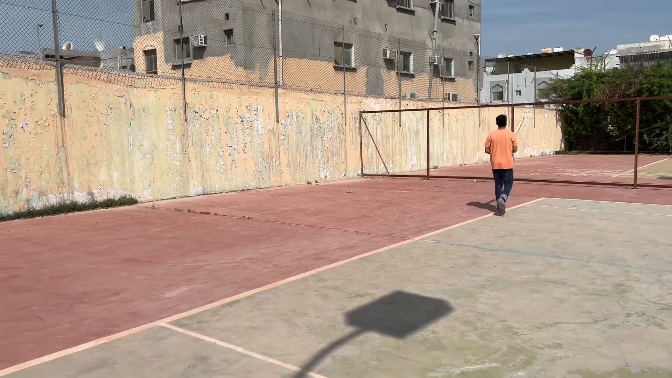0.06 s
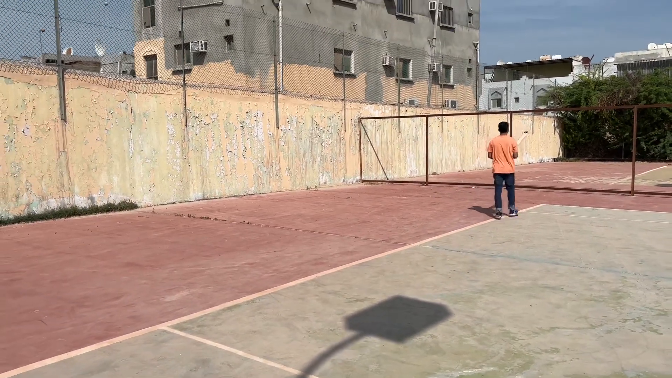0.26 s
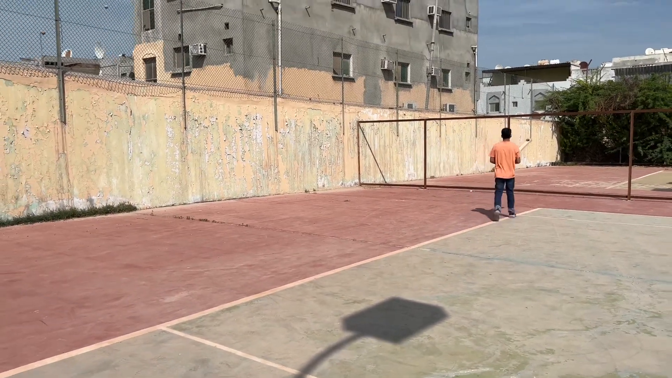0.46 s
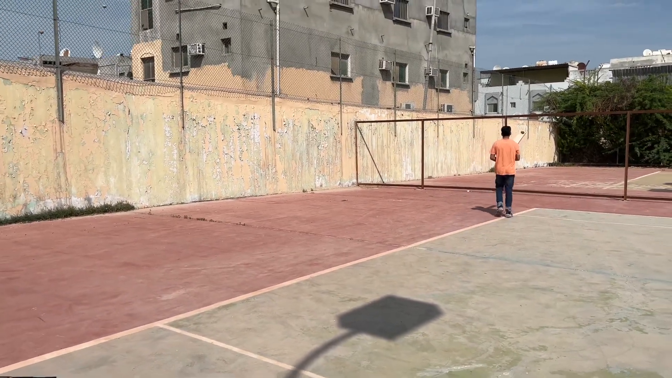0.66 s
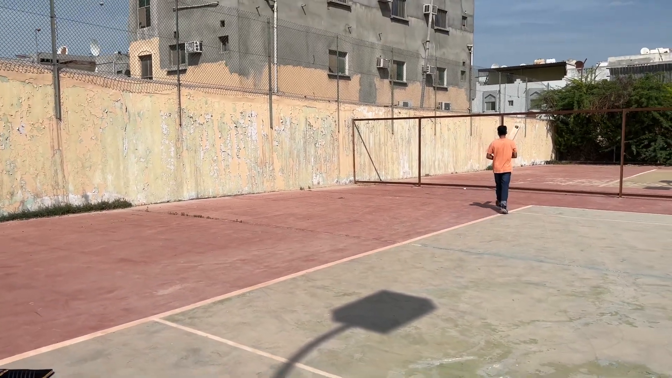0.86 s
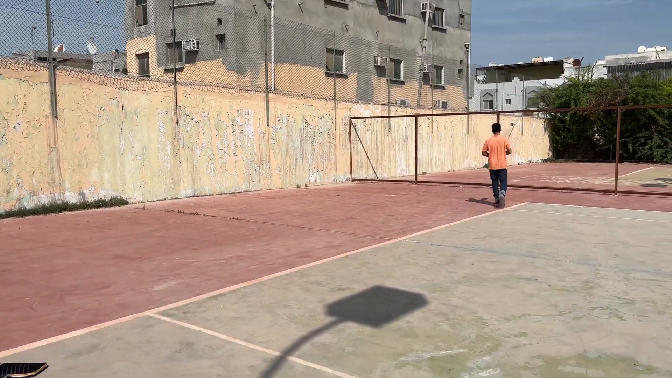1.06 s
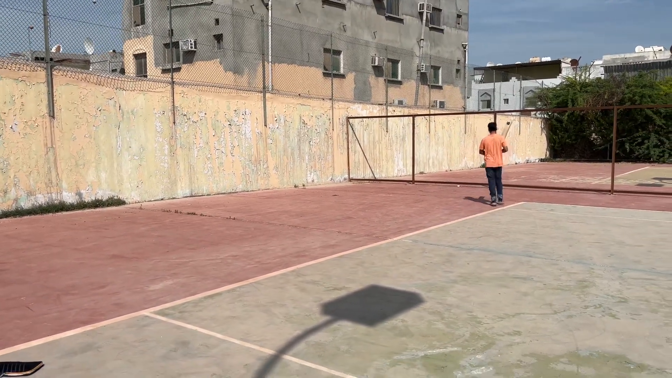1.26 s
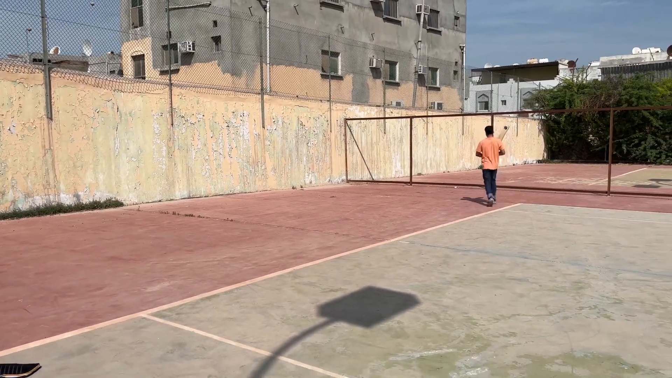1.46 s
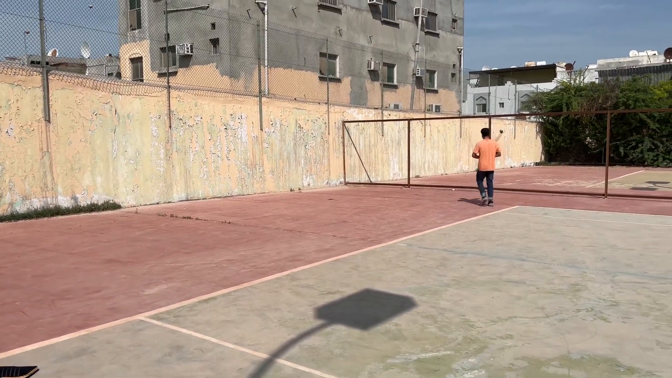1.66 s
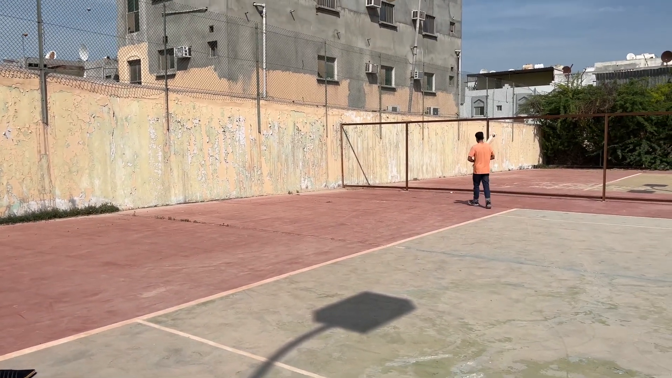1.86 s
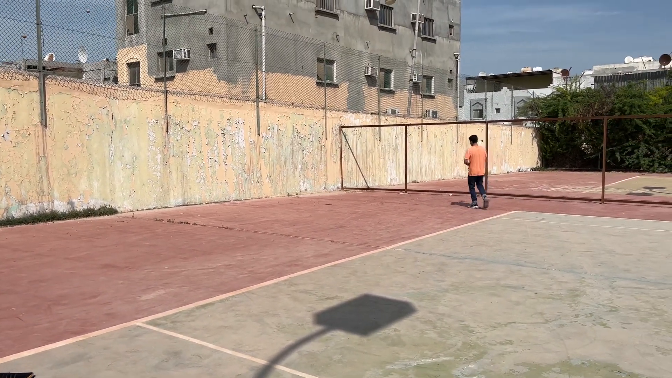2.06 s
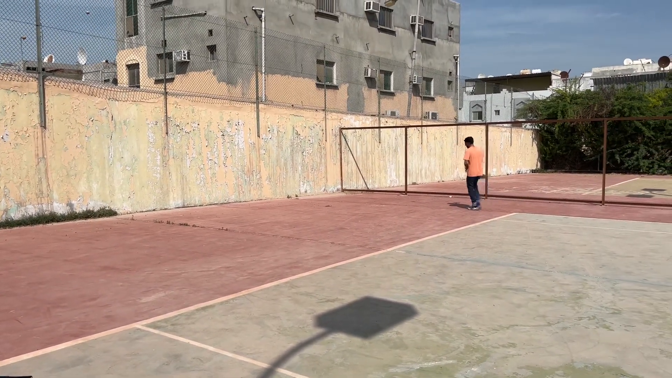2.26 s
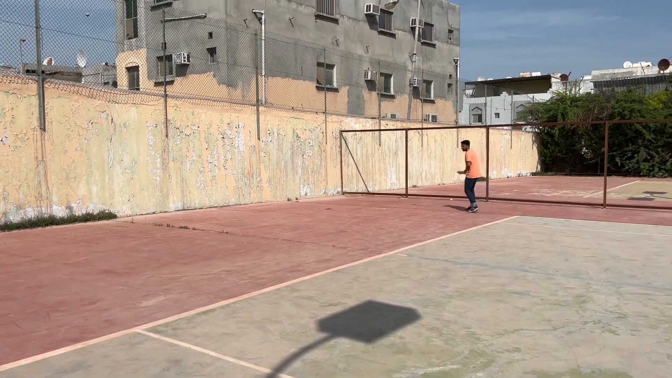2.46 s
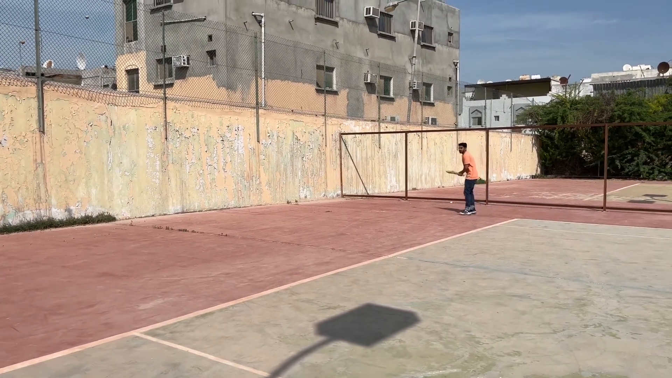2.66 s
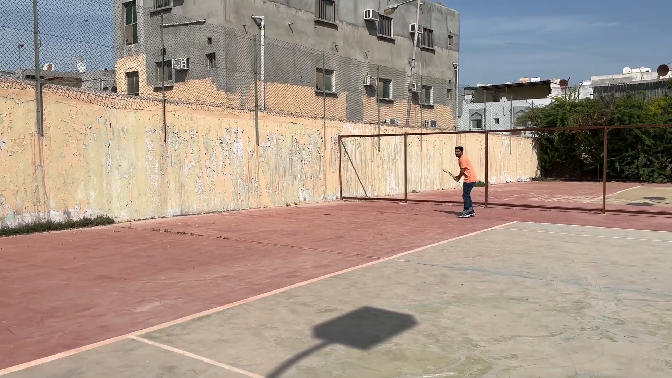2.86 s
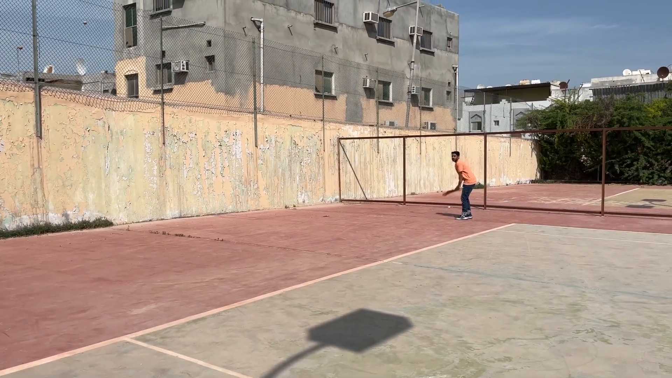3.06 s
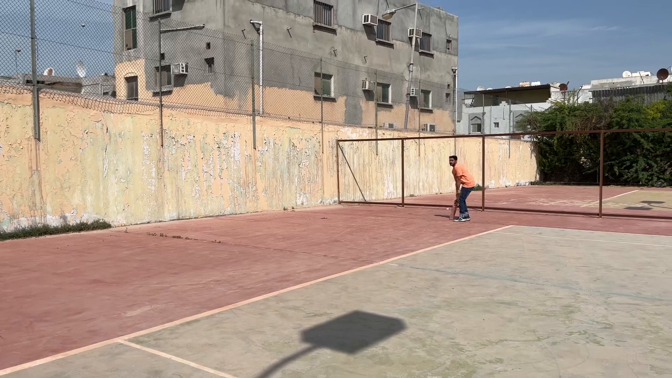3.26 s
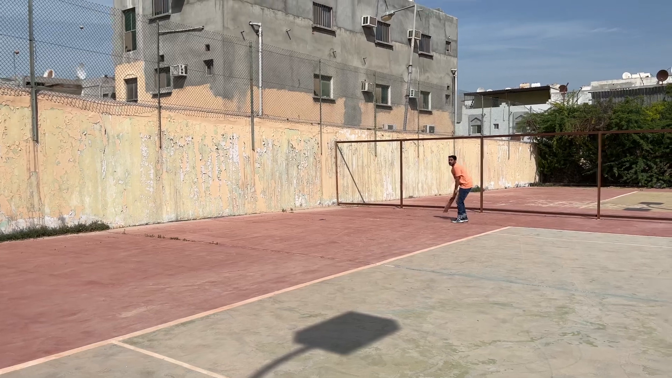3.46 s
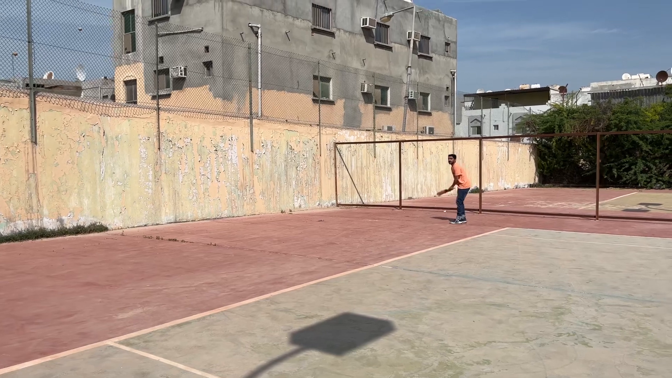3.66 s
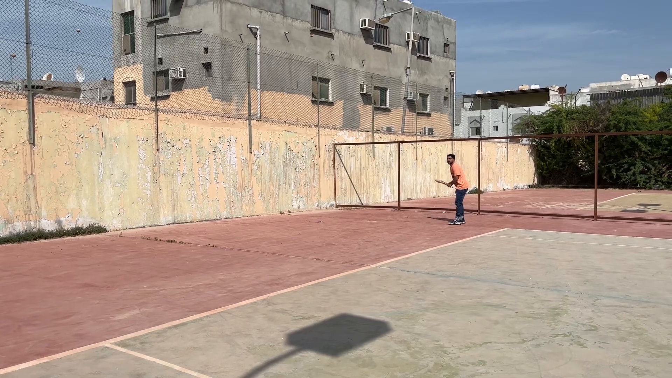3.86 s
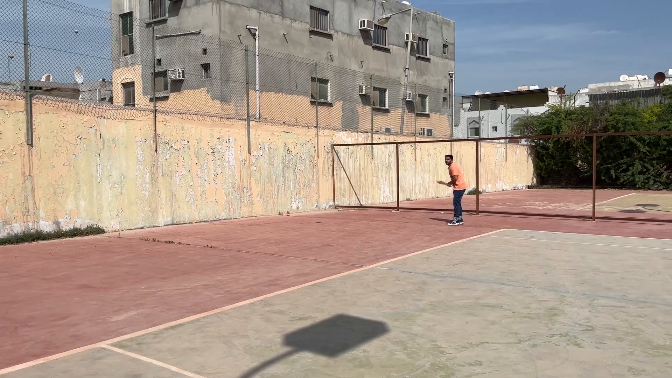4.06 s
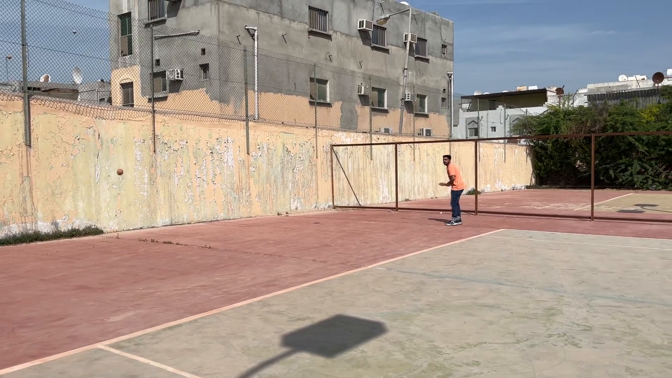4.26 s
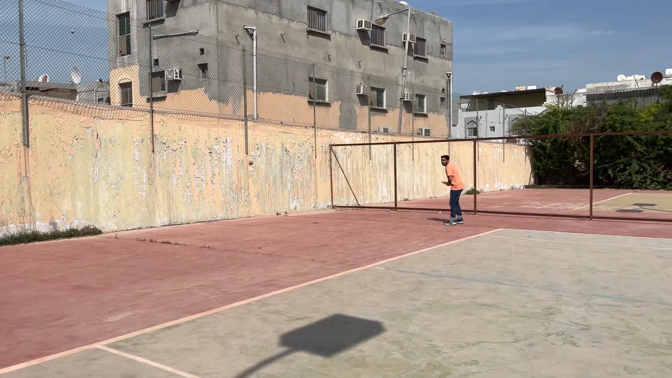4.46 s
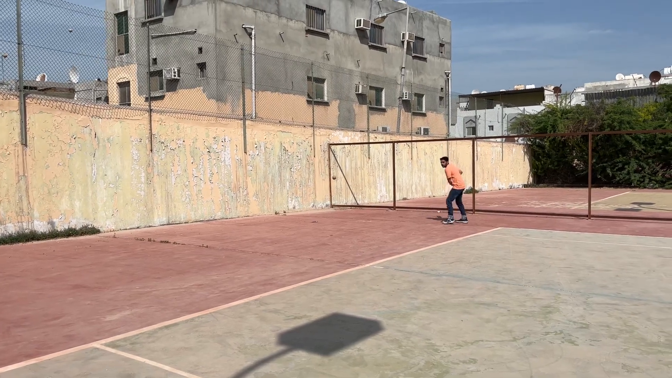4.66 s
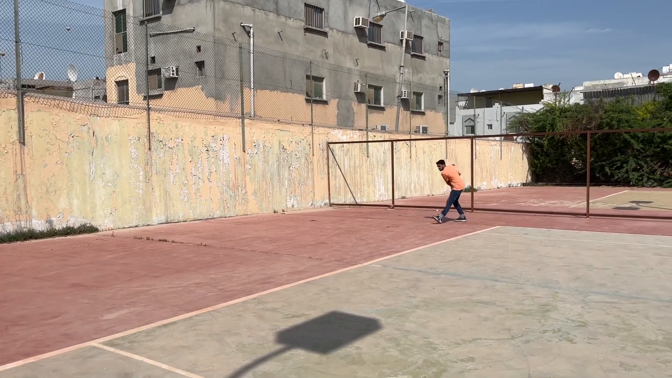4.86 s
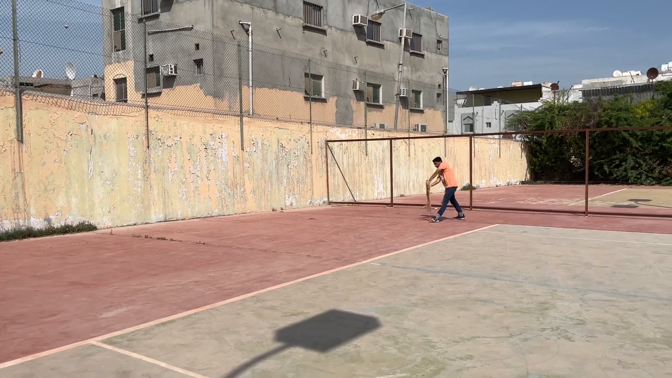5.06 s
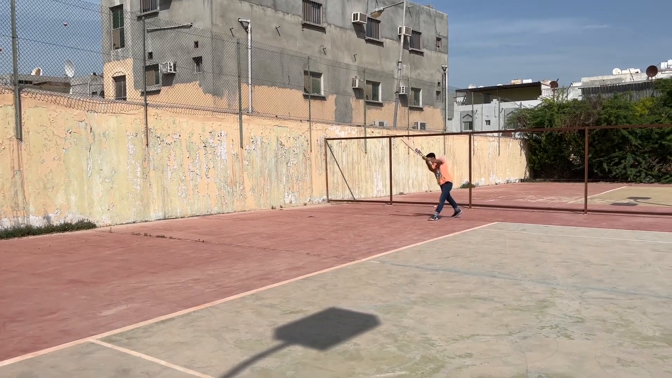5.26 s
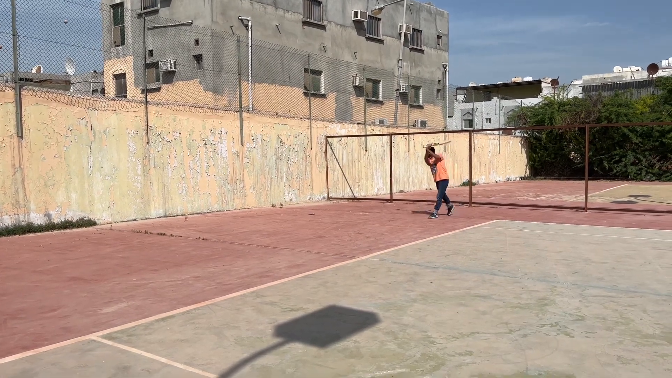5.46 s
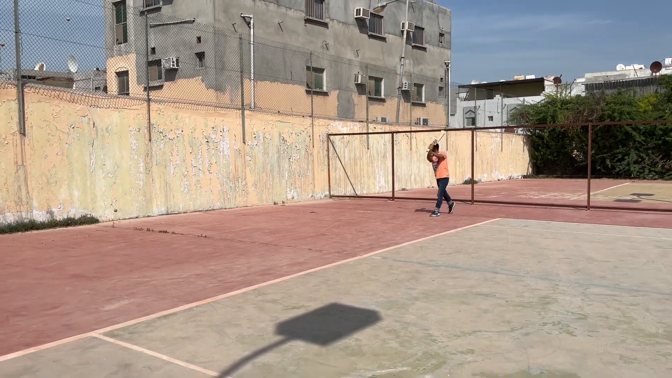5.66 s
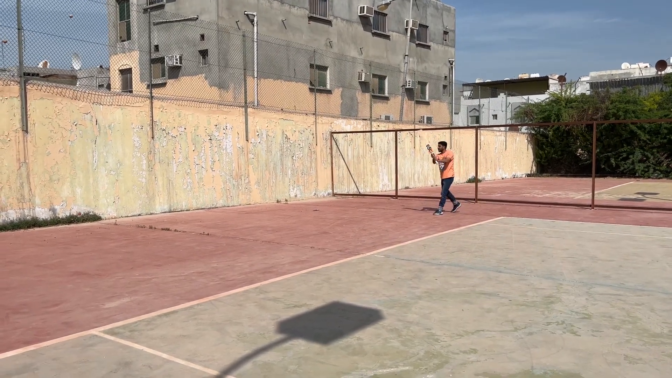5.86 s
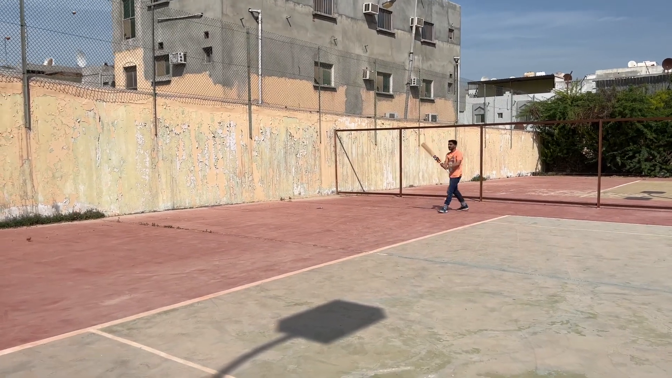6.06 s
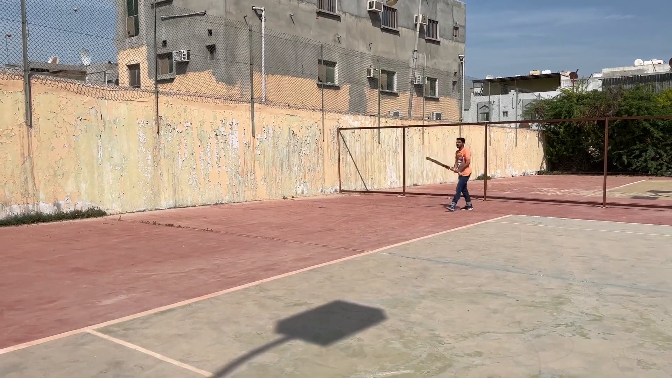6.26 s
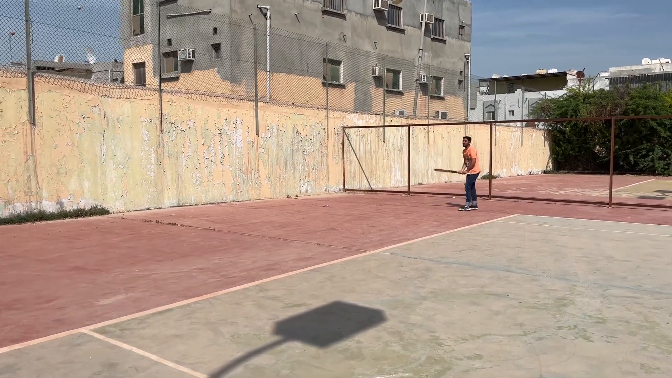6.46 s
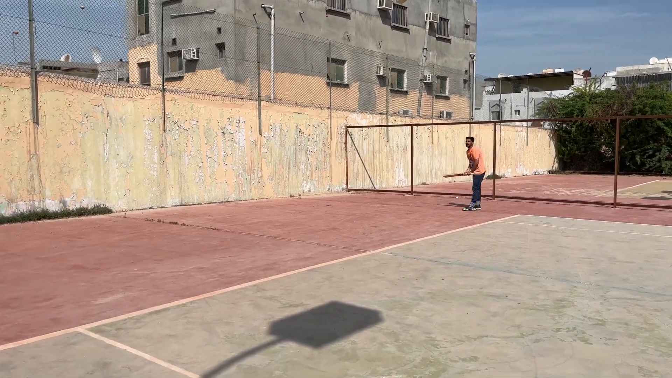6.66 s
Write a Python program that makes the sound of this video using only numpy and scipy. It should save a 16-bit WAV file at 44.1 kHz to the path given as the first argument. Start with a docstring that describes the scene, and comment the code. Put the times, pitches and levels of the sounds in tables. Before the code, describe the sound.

On a hard walled court outdoors, shoes scuff and sparrows chirp over faint town rumble and wind buffeting the microphone. After a faint opening knock, one loud hollow bat-and-ball knock rings out midway, echoing off wall and buildings. Later a flurry comes: a moderate knock, an even louder, brighter crack, then weaker knocks trailing off while a distant engine rises in pitch.

```python
"""Throughout, low noise swells as wind, filtered noise makes the town's rumble and an unsteady sine its drone.
From the start shoes scuff in shaped noise, soft sine thumps hit the microphones and sparrows sing gliding tones.
A faint knock of bat and ball opens; a loud one comes at 3.3 s with a dull answer, and a flurry runs from 5 to
6.4 s. Each is a ringing body and a crack, thrown back by fence, yard and near wall on a hard court. Bright noise
ticks come from 2.1 s, filtered slaps off far buildings from 3.4 s, and from 5.1 s an engine's sine orders climb."""
import sys
import numpy as np
from scipy import signal
from scipy.fft import rfft, irfft
from scipy.io import wavfile
from scipy.ndimage import uniform_filter1d

SR = 44100
rng = np.random.default_rng(int(sys.argv[2]) if len(sys.argv) > 2 else 0)


def transcribe(signal):
    """Save signal, clipped to [-1, 1], as a 16-bit WAV file at the path in sys.argv[1]."""
    frames = np.atleast_2d(signal).T
    limited = np.clip(frames, -1, 1)
    pcm = np.round(limited * 32767).astype(np.int16)
    wavfile.write(sys.argv[1], SR, pcm)


N = 296352
T = np.arange(N) / SR
HZ = np.fft.rfftfreq(N, 1 / SR) + 1e-3  # kept off zero for the logarithms
BLOW = signal.unit_impulse(2000)

# gusts of wind: (t/s, deep eddies level/dB, quicker eddies level/dB)
WIND = [(0.0, -55.5, -63.5), (0.69, -58.5, -64.5), (1.03, -51.5, -64), (1.55, -58, -60),
        (1.81, -51.5, -57.5), (2.34, -61, -60), (2.84, -47, -51), (3.27, -54, -51.5), (3.52, -44.5, -46),
        (3.76, -43.5, -55), (3.97, -44, -50), (4.15, -46.5, -49.5), (4.6, -46.5, -53.5), (5.03, -42, -42.5),
        (5.46, -50, -47.5), (5.71, -51.5, -47.5), (6.23, -52.5, -45.5), (6.72, -46.5, -48)]

# colour of the town, relative: (f/Hz, level/dB)
TOWN = [(70, -41), (120, -11), (200, -8), (290, -13.5), (400, -8.5), (640, -16.5), (2240, -25),
        (5300, -25.5), (7000, -44), (9300, -41.5), (12000, -47), (16000, -69)]
TOWN_DB = -56
HUM_HZ, HUM_DB = 193, -77  # a far machine drones around this pitch

# shoes dragging on the court: (t/s, length/s, hiss level/dB before GRIT_DB, dull rub level/dB)
SCUFFS = [(0.009, 0.29, -68.5, -63.5), (0.503, 0.064, -60, -82), (0.731, 0.24, -70.5, -78),
          (0.95, 0.14, -59, -59.5), (1.103, 0.29, -67, -69), (1.61, 0.13, -76.5, -68),
          (1.821, 0.1, -68, -63.5), (1.937, 0.09, -90, -57), (2.316, 0.052, -72, -54),
          (2.524, 0.21, -65.5, -67), (2.852, 0.042, -72.5, -85), (3.163, 0.067, -74.5, -63.5),
          (3.33, 0.15, -61, -69), (3.54, 0.019, -71.5, -60), (3.701, 0.029, -58.5, -59.5),
          (3.939, 0.11, -62.5, -55), (4.048, 0.11, -65, -64), (4.434, 0.044, -75, -91),
          (4.573, 0.02, -97, -54.5), (4.76, 0.017, -71, -82), (4.973, 0.095, -61, -56),
          (5.521, 0.033, -61.5, -77), (5.621, 0.13, -75, -61), (6.091, 0.051, -65, -60.5),
          (6.504, 0.11, -67.5, -64.5), (6.682, 0.028, -70, -53)]
# colour of the hiss, relative: (f/Hz, level/dB)
SCUFF_COLOUR = [(1470, -17), (2500, -11.5), (8530, -12.5), (9660, -12.5), (10100, -61), (11300, -13),
                (13100, -30), (13700, -21), (16000, -23.5)]
GRIT_DB = 8.15  # lifts every hiss
DRAG_ATTACK_S, DRAG_FADE_DB_PER_S, DRAG_RELEASE_DB_PER_S = 0.023, 9, 255

# soft low thumps on the microphones: (t/s, level/dB, f/Hz)
THUMPS = [(0.022, -40, 66.5), (0.972, -36.5, 106), (0.967, -35.5, 216), (3.335, -25.5, 96),
          (3.62, -33, 130), (4.07, -24, 77), (4.346, -29, 59.5)]
THUMP_OVERTONE_DB = -32

# rough chirps that leap up and fall away, levels before echoes: (t/s, length/s, top f/Hz, level/dB)
CHIRPS = [(0.373, 0.12, 4780, -52.5), (0.795, 0.066, 5020, -51), (1.054, 0.076, 4230, -61),
          (1.724, 0.12, 5080, -55), (2.881, 0.093, 5120, -52.5), (3.426, 0.065, 5260, -54),
          (3.509, 0.05, 4510, -54.5), (4.063, 0.1, 4970, -58), (4.453, 0.067, 4530, -55.5),
          (4.811, 0.17, 4660, -57), (5.373, 0.11, 5030, -58), (6.01, 0.074, 5180, -57),
          (6.076, 0.058, 4480, -55), (6.414, 0.042, 5320, -62)]
# clear arched cheeps: (t/s, length/s, top f/Hz, level/dB)
CHEEPS = [(0.034, 0.095, 4110, -60), (0.082, 0.015, 2340, -52.5), (0.21, 0.053, 3070, -62),
          (0.249, 0.035, 2940, -57), (0.68, 0.03, 3700, -60.5), (0.758, 0.02, 3140, -64),
          (0.794, 0.048, 5430, -57), (1.291, 0.015, 5450, -63.5), (1.38, 0.051, 5470, -69),
          (1.522, 0.032, 5390, -66.5), (1.549, 0.12, 4010, -65), (2.728, 0.034, 3910, -58),
          (2.893, 0.033, 5510, -55.5), (3.097, 0.066, 5600, -59.5), (3.169, 0.089, 5050, -65),
          (3.768, 0.035, 3950, -57.5), (3.836, 0.07, 4100, -61.5), (4.309, 0.055, 5750, -68),
          (4.369, 0.11, 5350, -62.5), (6.348, 0.039, 5840, -58), (6.464, 0.026, 3520, -69)]
# thin clean peeps from a nearer bird: (t/s, length/s, top f/Hz, level/dB)
PEEPS = [(0.654, 0.035, 4600, -51), (2.041, 0.042, 5780, -54), (2.093, 0.035, 5680, -49.5),
         (6.232, 0.05, 6100, -57), (6.296, 0.042, 5660, -57)]
# how each kind is sung: (fall/share of top, warble/share, second voice level/dB, echoes level/dB,
# pitch wobble/share of top)
CHIRP_VOICE = (.34, .05, -8, 5, .03)
CHEEP_VOICE = (.07, .035, -11, 5, .025)
PEEP_VOICE = (.04, .012, -18, -2, .01)
UPSTROKE, UPSTROKE_S = 0.1709, 0.00897  # share of the top by which a note starts low, and its settling time
SYLLABLE_DB = 5  # spread of the level within a note

# knocks of bat and ball, with two dull answers at 3.363 and 5.556 s: (t/s, body peak level/dB, body f/Hz,
# overtone level/dB, crack level/dB against body, crack tilt/dB per octave, left minus right level/dB,
# near wall level/dB against knock, distance out from the crease towards the phone's left/m,
# top of the body f/Hz, ping f/Hz, ping width/Hz)
KNOCKS = [(.036, -36.5, 1690, -12, 7.5, -6, -8, -21, 1.1, 2000, 3600, 300),
          (3.2977, -4, 803, 0, -25.5, -2, -3, -9, 0.16, 1960, 2380, 230),
          (3.363, -36.5, 910, -6, -26, -5, -1, -31, 0.092, 1500, 2500, 300),
          (5.01, -17.5, 800, 6, -11.5, -8.5, 0, -7, 0.11, 1760, 2640, 230),
          (5.111, 0.5, 790, 8.5, -7, 1.5, -0.5, -2, 0.061, 1450, 2490, 172),
          (5.5561, -26, 670, -10, -26, -16, 0, -33, 8.2, 1290, 2500, 400),
          (5.6333, -7, 755, -20, -6.5, -9, 3, -27.5, 2.34, 1824, 2900, 770),
          (6.0899, -27, 450, -48, -12.5, -10, 3, -10.5, 7.3, 1467, 2500, 400),
          (6.383, -29.5, 443, -20, -18, -9, 2, -41, 8.1, 1490, 2500, 396)]
# dull part of a knock: (multiple of body f, width/share of the mode's f, level/dB)
BODY = [(0.352, 0.75, -5), (.7, 0.81, 7), (1.03, 0.21, -2)]
# resonances of the crack, before its tilt: (f/Hz, width/Hz, level/dB)
CRACK = [(3930, 1270, -4), (4570, 1530, 7), (5600, 1430, -4), (8260, 1520, 6), (11900, 2270, 7.5),
         (14250, 650, -1.5)]
PING_DB = -4.5  # before the tilt
CRACK_LATE_MS = .45  # the crack is held back to line up with the filtered body
LEFT_LAG_MS, LEFT_LAG_MS_PER_M = 0.028, -0.048  # how much later the left port hears a knock
FENCE_DB, FENCE_T60_S = -17, 0.12
YARD_DB, YARD_DB_PER_M = -33.5, -3  # a knock nearer the phone stands further above the yard
YARD_HZ, YARD_HOLD_S = 1250, 0.34
YARD_FADE_DB_PER_S, YARD_LATE_FADE_DB_PER_S = 10, 23  # the second joins in after the hold
YARD_LUMPS_DB, YARD_PING = 5.5, .8
WALL_S = .0223
# ledges behind the wall face: (left t/ms after the face, left level/dB, right level/dB, right later still/ms)
WALL_STEPS = [(4.2, -21, -15.5, 0.21), (6.5, -6, -15, 0.54)]

# small sharp clicks near the phone: (t/s, level/dB)
CLICKS = [(2.109, -44), (2.127, -46), (2.141, -41), (2.252, -50.5), (5.53, -30.5), (5.534, -29.5)]
CLICK_PAN_DB = 9

# slaps thrown back by far buildings: (t/s, level/dB, f/Hz, width/Hz, left minus right level/dB)
SLAPS = [(3.422, -39, 900, 450, 2), (3.45, -40, 1050, 400, -2), (3.473, -29.5, 714, 500, 1),
         (3.725, -41.5, 810, 150, 0), (3.743, -38, 950, 450, 3), (5.237, -31, 600, 500, -2),
         (5.279, -21.5, 380, 410, -2), (5.288, -21, 520, 500, -3), (5.294, -41, 2380, 300, 8),
         (5.337, -33.5, 2400, 350, 4), (5.362, -44, 2450, 200, 4), (5.363, -35, 596, 300, -2),
         (5.445, -48, 2500, 200, -2.5), (5.413, -31, 640, 497, 2), (5.455, -48, 750, 503, -0.5),
         (5.816, -28.5, 444, 500, 0)]

# engine gathering speed: (t/s, firing f/Hz, level/dB before the order levels)
ENGINE = [(5.1, 66.07, -52), (5.27, 69, -44), (5.45, 69.2, -42), (5.6, 72.04, -46), (5.94, 80, -50.5),
          (6.1, 85, -50), (6.28, 92.1, -44), (6.471, 96.7, -48), (6.6, 97, -61)]
# engine orders: (multiple of firing f, level/dB)
ENGINE_ORDERS = [(1, -1.5), (1.5, -7.5)]

# notches of the microphone ports: (f/Hz, width/Hz, depth/0-1)
NOTCHES = [(10020, 2800, 0.92), (13840, 1900, 0.7), (2650, 680, 0.28)]
SMEAR_S, SMEAR_POWER = 0.002, 0.825  # delay at 800 Hz, and how steeply it grows towards the bass
TOP_HZ = 16300


def undb(db):
    """Turn decibels into an amplitude factor."""
    return 10 ** (np.asarray(db) / 20)


def level(x, db):
    """Set the RMS level."""
    return x * undb(db) / np.sqrt(np.mean(x ** 2))


def ring(x, hz, width):
    """A two-pole resonance with gain 1 at its centre."""
    return signal.lfilter(*signal.iirpeak(hz, hz / width, SR), x)


def filtered(x, order, hz, kind="low"):
    """A Butterworth low or high pass."""
    return signal.lfilter(*signal.butter(order, hz, kind, fs=SR), x)


def colour(x, points):
    """Shape a spectrum through (Hz, dB) points."""
    hz, db = np.transpose(points)
    return irfft(rfft(x) * undb(np.interp(np.log(HZ), np.log(hz), db)), N)


def walk(rate):
    """Random levels, each held for 1 / rate seconds, then smoothed twice."""
    k = int(SR / rate)
    steps = np.repeat(rng.standard_normal(N // k + 1), k)
    return 0.8 * uniform_filter1d(uniform_filter1d(steps, k), k)[:N]


def wide(alike):
    """Stereo noise: this share of its power is common, the rest has opposite signs left and right."""
    mid, side = rng.standard_normal((2, N))
    return np.sqrt(alike) * mid + np.sqrt(1 - alike) * side * np.array([[1], [-1]])


def add(out, x, s, db, pan_db, left_lag_ms=0):
    """Mix in a mono or stereo sound at a time, level and side; the left may hear it later."""
    for ear, side in enumerate((1, -1)):
        lag = round(left_lag_ms * SR / 1000) if ear == 0 else 0
        i = max(int(s * SR) + lag, 0)
        heard = np.atleast_2d(x)[-ear][:N - i]  # mono feeds both ears
        out[ear, i:i + len(heard)] += heard * undb(db + side * pan_db / 2)


def wind():
    """Low eddies of two sizes flutter on the ports: resonant noise with wandering levels."""
    s, deep_db, quick_db = np.transpose(WIND)
    deep = ring(ring(wide(0.75), 62, 35), 55, 90) * undb(3.5 * walk(14))
    deep = filtered(deep, 2, 42, "high")
    quick = ring(ring(wide(1.0), 92, 45), 95, 160) * undb(4.2 * walk(22))
    return level(deep, 0) * undb(np.interp(T, s, deep_db)) + level(quick, 0) * undb(np.interp(T, s, quick_db))


def town():
    """Far traffic and air: bass alike left and right, treble less so, each octave swelling alone; a drone."""
    low = filtered(wide(1.0), 1, 700)
    high = filtered(wide(0.51), 1, 700, "high")
    air = colour(low + high, TOWN)
    octaves = 100 * 2. ** np.arange(8)
    air = sum(ring(air, hz, hz * 0.72) * undb(5.0 * walk(10)) for hz in octaves)
    hum_turns = np.cumsum(HUM_HZ * (1 + 0.0135 * walk(5.6))) / SR
    hum = np.sin(2 * np.pi * hum_turns) * undb(11.0 * walk(2.4))
    return level(air, TOWN_DB) + level(hum, HUM_DB)


def shoes():
    """Dense grit under a sliding sole over a duller rub; each drag swells in briefly, sinks slowly, then dies away."""
    hiss, dull = np.zeros((2, N))
    for s, length, hiss_db, rub_db in SCUFFS:
        fade_db = DRAG_FADE_DB_PER_S * np.clip(T - s, 0, length)
        fade_db += DRAG_RELEASE_DB_PER_S * np.maximum(T - s - length, 0)
        edge = np.clip((T - s) / DRAG_ATTACK_S, 0, 1) * undb(-fade_db)
        hiss += edge * undb(hiss_db)
        dull += edge * undb(rub_db)
    grit = colour(wide(0.59) * undb(2.0 * walk(300) + 4.2 * walk(35)), SCUFF_COLOUR)
    rub = ring(ring(wide(0.71), 2350, 1700), 1700, 2150)
    return level(grit, GRIT_DB) * hiss + level(rub, 0) * dull


def thumps():
    """Rounded puffs: a low sine and a faint overtone swell and die within three cycles."""
    out = np.zeros((2, N))
    for s, db, hz in THUMPS:
        turns = T[:int(3 * SR / hz)] * hz
        puff = np.sin(2 * np.pi * turns) + undb(THUMP_OVERTONE_DB) * np.sin(2 * np.pi * 2.8 * turns)
        add(out, puff * np.sqrt(turns) * np.exp(1 - turns / 0.64), max(s - .005, 0), db, 0)
    return out


def sparrow_note(length, top_hz, fall, warble, second_db, wobble):
    """A two-voiced tone slides up, then falls, with a fast warble and an uneven level."""
    u = np.arange(int(length * SR)) / (length * SR)  # 0 to 1 through the note
    pitch = 1 - fall * u ** .75 - UPSTROKE * np.exp(-u * length / UPSTROKE_S)
    pitch += wobble * np.interp(u, np.linspace(0, 1, 8), rng.standard_normal(8))
    flutter = 1 + warble * np.sin(2 * np.pi * (70 * u * length + rng.random()))
    turns = np.cumsum(top_hz * pitch * flutter) / SR
    tone = np.sin(2 * np.pi * turns) + undb(second_db) * np.sin(2 * np.pi * 1.13 * turns)
    swell = np.sin(np.pi * u ** 0.9) ** 0.7
    return tone * swell * undb(SYLLABLE_DB * np.interp(u, np.linspace(0, 1, 12), rng.standard_normal(12)))


def sparrows():
    """Sliding notes are half lost in the decaying echoes of the yard; a far flock chatters."""
    out = np.zeros((2, N))
    flock = [(6.6 * a, 0.031 + 0.044 * b, 3200 + 2400 * c, -72 + 6 * d) for a, b, c, d in rng.random((40, 4))]
    notes = [n + CHIRP_VOICE for n in CHIRPS + flock]
    notes += [n + CHEEP_VOICE for n in CHEEPS] + [n + PEEP_VOICE for n in PEEPS]
    for s, length, top_hz, db, fall, warble, second_db, echo_db, wobble in notes:
        tone = sparrow_note(length, top_hz, fall, warble, second_db, wobble)
        echoes = rng.standard_normal((3, 6000)) * np.exp(-T[:6000] / 0.043)
        # each side has its own echoes and a shared part
        echoes = undb(echo_db) * (echoes[:2] + 0.47 * echoes[2]) / np.sqrt(2 * np.sum(echoes[0] ** 2))
        echoes[:, 200] += .55  # the straight path
        add(out, signal.fftconvolve(echoes, tone[None]), s - .005, db, 2.5, .21)
    return out


def knock_body(hz, over_db, top_hz):
    """The dull part: a blow rings broad modes; the ball gives way, so they get no treble."""
    modes = BODY + [(2.3, 0.22, over_db)]
    body = sum(undb(g) * ring(BLOW, m * hz, m * hz * w) / (m * w) for m, w, g in modes)
    body = signal.sosfilt(signal.butter(6, top_hz, fs=SR, output="sos"), body)
    return body / np.abs(body).max()


def knock_crack(tilt_db, ping_hz, ping_width):
    """The short bright part: a splintered blow rings high modes and a ping, tilted about 4400 Hz."""
    splinters = BLOW + 0.12 * rng.standard_normal(len(BLOW)) * np.exp(-T[:len(BLOW)] / 0.0014)
    modes = CRACK + [(ping_hz, ping_width, PING_DB)]
    crack = sum(undb(g + tilt_db * np.log2(f / 4400)) * ring(ring(splinters, f, w), f, 2 * w) / w
                for f, w, g in modes)
    return np.roll(crack, int(CRACK_LATE_MS * SR / 1000)) / np.abs(crack).max()


def fence_and_yard(body, crack_db, tilt_db, out_m):
    """Fence and ground scatter at once; the yard answers in lumps with most of its treble gone."""
    t = T[:SR * 2]
    grains = rng.standard_normal((2, 2, len(t))) * 0.074
    yard_grains, fence_grains = grains + 0.029 * grains[:, ::-1]  # a little left in right and back
    yard = filtered(yard_grains, 2, YARD_HZ)
    yard += 1.22 * yard_grains * undb(-60 * t)  # treble dies sooner
    yard += 0.2 * ring(yard_grains, 1400, 700) + YARD_PING * ring(yard_grains, 2210, 160)
    yard *= np.minimum(t / .015, 1) * undb(YARD_LUMPS_DB * walk(85)[:len(t)])
    # the furthest houses have answered once the hold is over
    yard_fade_db = YARD_FADE_DB_PER_S * t + YARD_LATE_FADE_DB_PER_S * np.maximum(t - YARD_HOLD_S, 0)
    fence = filtered(fence_grains, 1, 2500) + 0.63 * ring(fence_grains, 2020, 1000)
    tail = yard * undb(YARD_DB + YARD_DB_PER_M * out_m - yard_fade_db)
    tail += fence * undb(FENCE_DB - 60 * t / FENCE_T60_S)
    # scattering evens out the crack's peaks
    smooth_crack = undb(crack_db + 22 + 0.6 * tilt_db) * ring(ring(BLOW, 3400, 5300), 3700, 9900)
    return signal.fftconvolve(tail, (body + smooth_crack)[None])


def near_wall(knock):
    """The rough wall answers from its face, from ledges behind and from scattered spots."""
    spots = rng.standard_normal((2, 700)) * 0.045 * np.exp(-T[:700] / 0.003)
    for ms, left_db, right_db, later_ms in WALL_STEPS:
        spots[0, int(ms * SR / 1000)] += undb(left_db)
        spots[1, int((ms + later_ms) * SR / 1000)] += undb(right_db)
    face = filtered(BLOW[:700], 2, 7000)
    return signal.fftconvolve(knock[None], filtered(spots, 1, 1800) + face)


def knocks():
    """Each knock or dull answer is a body and a short crack, then fence, yard and wall echoes."""
    out = np.zeros((2, N))
    for (s, db, hz, over_db, crack_db, tilt_db, pan_db, wall_db, out_m, top_hz, ping_hz, ping_width) in KNOCKS:
        body = knock_body(hz, over_db, top_hz)
        knock = body + undb(crack_db) * knock_crack(tilt_db, ping_hz, ping_width)
        add(out, knock, s, db, pan_db, LEFT_LAG_MS + LEFT_LAG_MS_PER_M * out_m)
        add(out, fence_and_yard(body, crack_db, tilt_db, out_m), s + 0.0024, db, 0)
        add(out, near_wall(knock), s + WALL_S, db + wall_db, 2.5, -.2)
    return out


def clicks():
    """Bright ticks: a few milliseconds of dying noise through broad resonances."""
    out = np.zeros((2, N))
    for s, db in CLICKS:
        burst = rng.standard_normal(300) * np.exp(-T[:300] / 0.0024)
        tick = ring(ring(burst, 3800, 7300), 4000, 8500)
        add(out, tick / np.abs(tick).max(), s, db, CLICK_PAN_DB)
    return out


def slaps():
    """Far buildings throw back a blow narrowed by three resonances and dulled by the long way."""
    out = np.zeros((2, N))
    for s, db, hz, width, pan_db in SLAPS:
        slap = ring(ring(ring(BLOW, hz, width), hz, 2 * width), hz, 2 * width)
        slap = signal.sosfilt(signal.butter(4, hz + width, fs=SR, output="sos"), slap)
        add(out, slap / np.abs(slap).max(), s, db, pan_db, .25)
    return out


def engine():
    """A vehicle down the street gathers speed; its low sine orders climb and waver."""
    s, hz, db = np.transpose(ENGINE)
    turns = np.cumsum(np.interp(T, s, hz) * (1 + 0.0123 * walk(6))) / SR
    lines = sum(undb(g + 2.5 * walk(9)) * np.sin(2 * np.pi * (m * turns + rng.random()))
                for m, g in ENGINE_ORDERS)
    fade_in = np.clip((T - s[0]) / .1, 0, 1)
    return np.sqrt(2) * lines * undb(np.interp(T, s, db)) * fade_in


def scene():
    """Layer every source, in order of first appearance."""
    return wind() + town() + shoes() + thumps() + sparrows() + knocks() + clicks() + slaps() + engine()


def record(dry):
    """The phone's ports notch the treble, its filters let the bass arrive later, the top is cut."""
    for hz, width, depth in NOTCHES:
        dry = dry - depth * ring(dry, hz, width)
    lag = SMEAR_S * (800 / np.clip(HZ, 150, 1700)) ** SMEAR_POWER
    phase = -2 * np.pi * np.cumsum(lag) * SR / N  # summed delay over frequency
    smeared = irfft(rfft(dry) * np.exp(1j * phase), N)
    return signal.sosfilt(signal.ellip(8, .2, 80, TOP_HZ, fs=SR, output="sos"), smeared)


dry = scene()
out = record(dry)
transcribe(out)
```